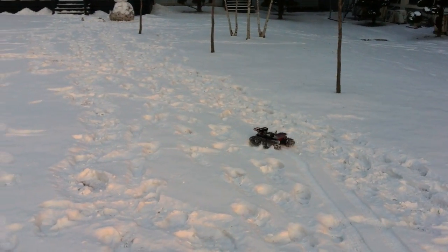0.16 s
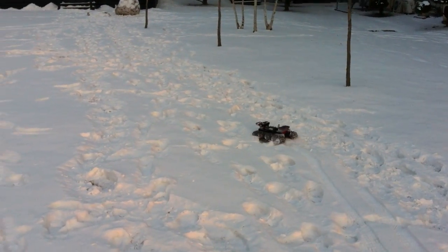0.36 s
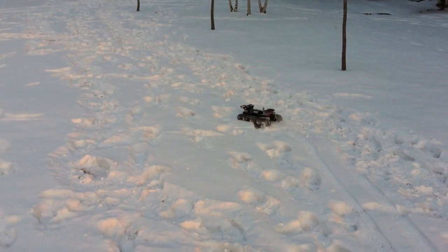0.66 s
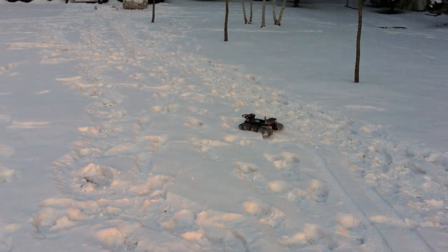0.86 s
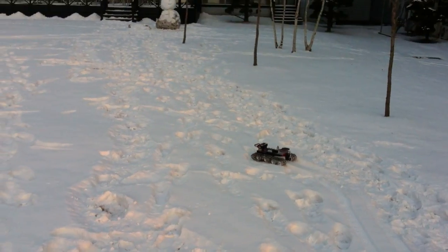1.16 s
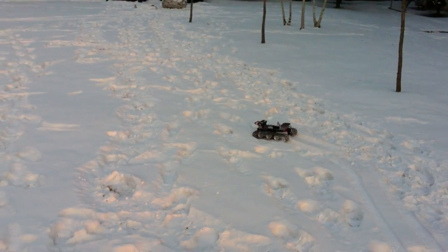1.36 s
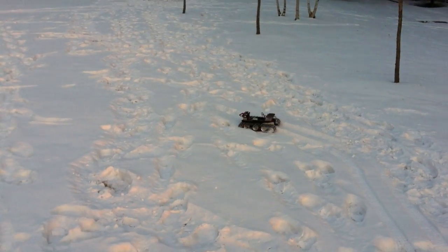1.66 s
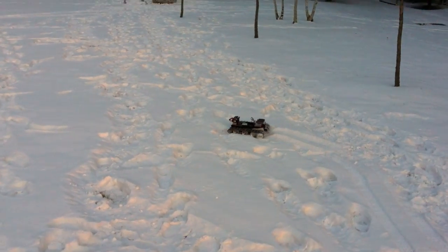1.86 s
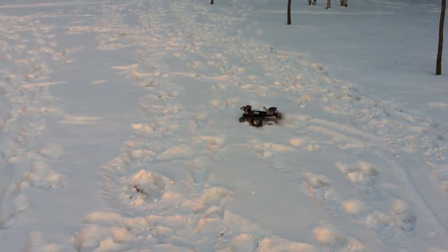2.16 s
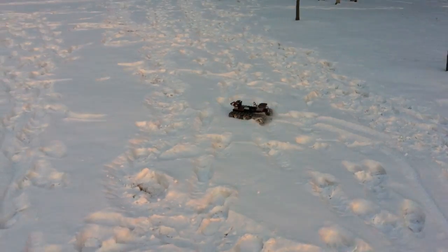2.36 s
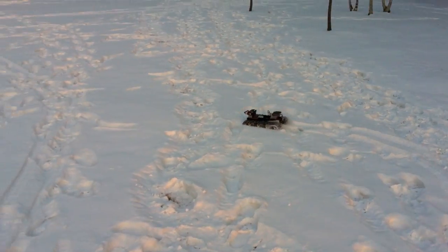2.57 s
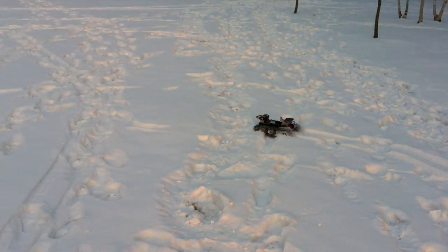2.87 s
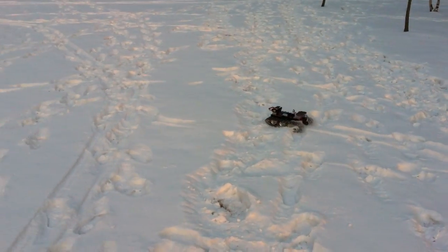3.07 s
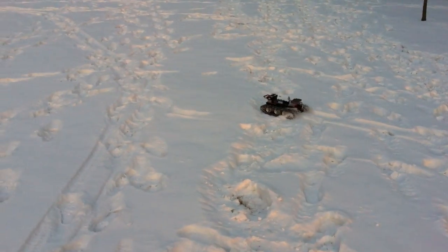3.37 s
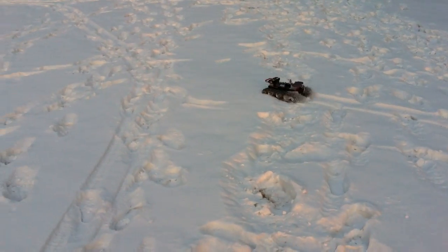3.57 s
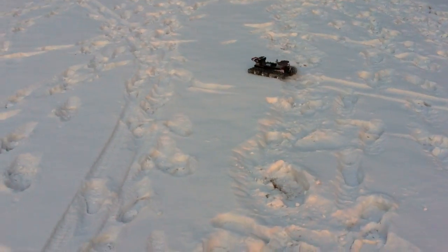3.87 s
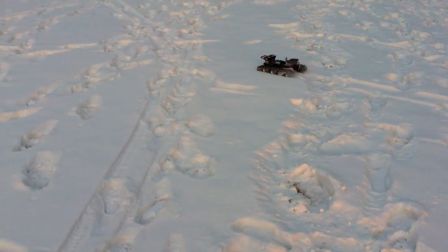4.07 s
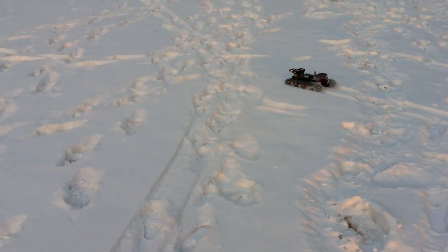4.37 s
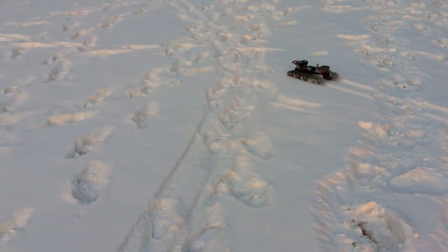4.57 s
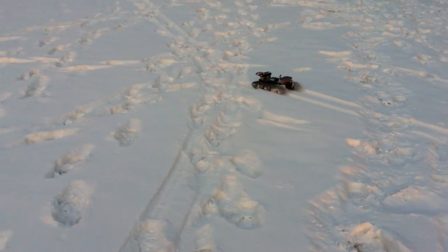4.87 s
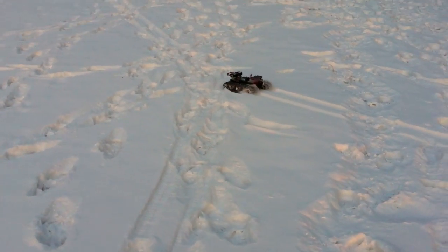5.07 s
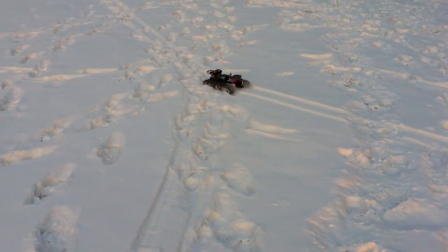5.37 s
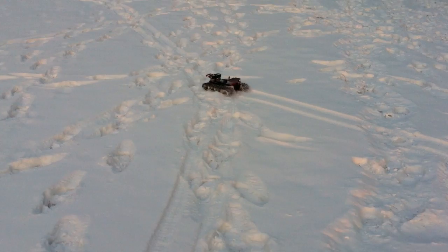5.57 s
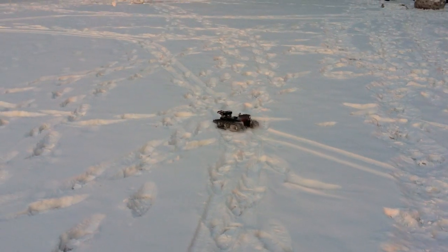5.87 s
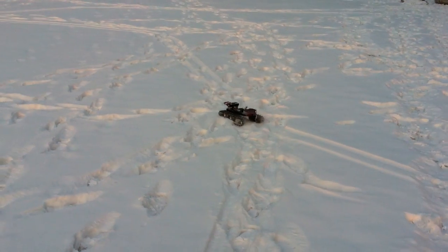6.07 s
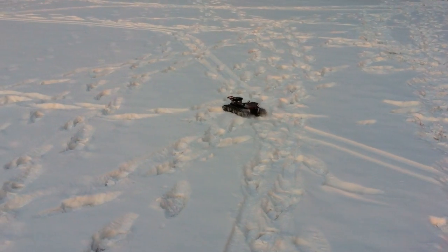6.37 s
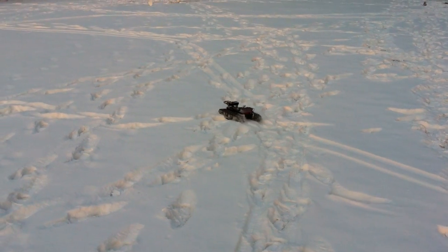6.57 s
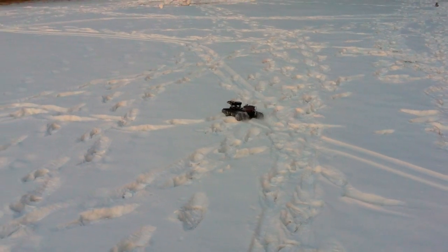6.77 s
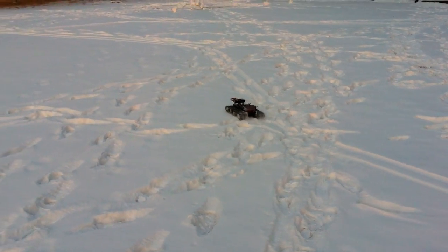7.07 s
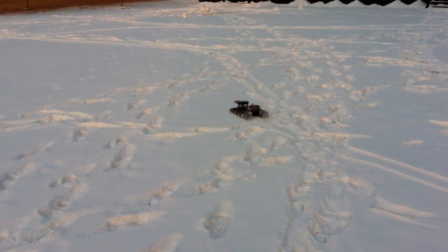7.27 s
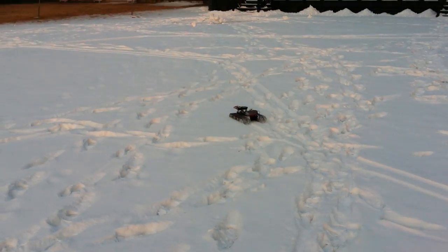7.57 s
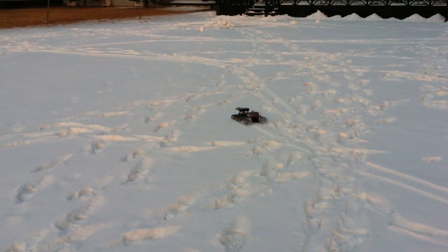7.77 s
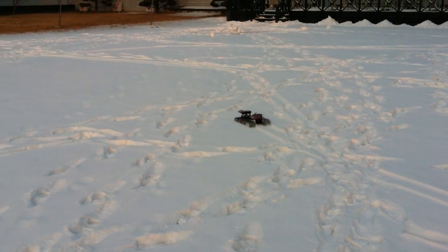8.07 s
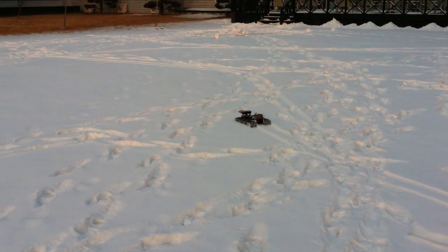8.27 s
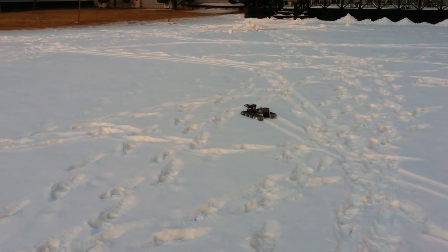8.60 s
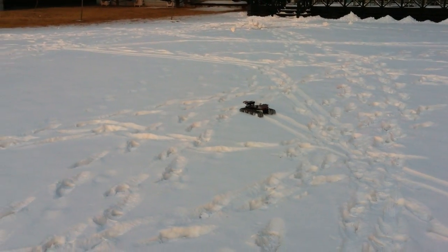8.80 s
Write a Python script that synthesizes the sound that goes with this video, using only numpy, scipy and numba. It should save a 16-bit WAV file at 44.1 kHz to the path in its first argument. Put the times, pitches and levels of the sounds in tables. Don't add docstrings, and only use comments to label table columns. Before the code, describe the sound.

Dry, close outdoor sound of a toy-sized tracked machine on trodden snow. First comes a halting, wavering motor whine with light gear rattle and a few crusty ticks, then a sudden speed-up into dense, bright buzzing clatter with rapid fluttering as the tracks bite. Muted snow crunches and low wind buffeting lie beneath. Just after eight seconds the motor slows to a weak creep, while wind bumps on the microphone grow much stronger.

```python
import sys
import numpy as np
from scipy import signal
from scipy.io import wavfile
from scipy.ndimage import uniform_filter1d
from numba import njit

SR = 44100
rng = np.random.default_rng(int(sys.argv[2]) if len(sys.argv) > 2 else 0)


def to_linear_factor(level_db):
    exponent = np.asarray(level_db, float) / 20
    return 10 ** exponent


def materialize(psi):
    bounded = np.clip(np.atleast_2d(psi).T, -1, 1)
    quanta = np.round(bounded * 32767).astype(np.int16)
    wavfile.write(sys.argv[1], SR, quanta)


N = 394254
T = np.arange(N) / SR


@njit
def svf(x, hz, width):
    y, b, l = np.empty(len(x)), 0., 0.
    for i in range(len(x)):
        g, k = np.tan(np.pi * hz[i] / SR), width / hz[i]
        v = (b + g * (x[i] - l)) / (1 + g * (g + k))
        b, l, y[i] = 2 * v - b, l + 2 * g * v, k * v
    return y


def band(x, hz, width):
    hz = hz + np.zeros(N)
    return svf(svf(x, hz, 1.62 * width), hz, 1.62 * width)


def unit(x):
    return x / np.sqrt(np.mean(x ** 2))


def noise_mode(hz, width, force=1):
    return unit(band(force * rng.standard_normal(N), hz, width))


def columns(table):
    s, *cols = np.transpose(table)
    return [np.interp(T, s, c) for c in cols]


def walk(rate):
    k = int(SR / rate)
    steps = np.repeat(rng.standard_normal(N // k + 1), k)
    return unit(uniform_filter1d(uniform_filter1d(steps, k), k)[:N])


def bursts(events):
    out = np.zeros(N + 4096)
    t = np.arange(-2048, 2048) / SR
    for s, db, hz, ms in events:
        i = int(s * SR)
        out[i:i + 4096] -= to_linear_factor(db) * np.exp(-(t / (0.00056 * ms)) ** 2) * np.cos(2 * np.pi * hz * t)
    return out[2048:N + 2048]


# t/s, peak level/dB, rise/s, fall/s
STEPS = [(.01, -69, 0.027, 0.045), (.32, -51, 0.33, 0.082), (1.03, -51.5, 0.025, 0.12),
         (1.939, -55, 0.17, 0.21), (2.31, -52, 0.017, 0.017), (2.71, -47, 0.028, 0.051),
         (3.19, -54.5, 0.39, 0.098), (3.56, -51, 0.25, 0.15), (3.74, -53, 0.05, 0.11),
         (8.17, -64, 0.06, 0.049), (4.31, -49.5, 0.15, 0.18), (5.03, -51.5, 0.13, 0.15),
         (5.98, -50, 0.15, 0.047), (6.77, -55.5, 0.55, 0.19), (7.12, -57, 0.028, 0.14),
         (8.79, -63, .02, .02)]


def boots_db():
    hum_db = -57 - 0.2053 * T + walk(9)
    power = to_linear_factor(2 * hum_db)
    for s, db, rise, fall in STEPS:
        power = power + to_linear_factor(2 * db) * np.exp(-((T - s) / np.where(T < s, rise, fall)) ** 2)
    return 10 * np.log10(power)


# t/s, peak level/dB, f/Hz
TICKS = [
    (0.295, -42, 902),
    (0.442, -39, 1980),
    (0.536, -36.5, 1338),
    (0.701, -38.5, 952),
    (1.229, -37, 570),
    (2.698, -46, 444),
    (7.746, -36.5, 1266),
]


def snow(crunch_db):
    grains = rng.standard_normal(N) * to_linear_factor(2.1 * walk(150))
    crunch = 0
    for hz, width, db in [(438, 337, 4.8), (806, 560, 4.5), (1314, 640, 4.1)]:
        crunch = crunch + to_linear_factor(db + 1.6 * walk(12)) * unit(band(grains, hz, width))
    ticks = bursts([(s + 0.0021, db - 0.5, 0.6 * hz, 1.6) for s, db, hz in TICKS])
    return to_linear_factor(crunch_db - 1.9) * unit(crunch) + ticks


# t/s, level/dB
GUSTS = [(0, -62), (.35, -62), (.95, -63), (1.05, -59), (1.45, -63.5), (2, -59), (3.2, -60), (3.7, -59),
         (4.3, -58), (4.83, -64), (5.15, -57.5), (5.65, -60.5), (5.97, -55.5), (6.1, -63), (7.6, -63.5),
         (8.25, -61), (8.45, -57), (8.94, -60.5)]
# t/s, peak level/dB, f/Hz, length/ms
THUMPS = [(1.981, -44.5, 148.5, 8.4), (2.06, -46, 232, 15), (3.695, -46, 150, 6.3),
          (3.724, -41, 191.6, 3.46), (3.812, -43, 163.4, 7.3), (3.877, -47.5, 233, 30),
          (4.073, -44, 182, 12), (4.197, -43, 205.8, 20), (4.319, -48, 229.8, 4.73), (5.165, -42, 137, 9.5),
          (5.325, -41, 171.2, 18), (5.372, -42, 152.7, 6.7), (5.515, -49, 131, 14), (5.591, -42, 182, 7.2),
          (5.783, -40, 155, 5.4), (5.902, -44, 168.6, 6.6), (5.929, -37.5, 163, 7.4),
          (5.978, -46, 136.8, 8.8), (7.783, -40, 164.3, 11), (7.814, -36.5, 170.2, 5.4),
          (8.335, -42, 169, 9.5), (8.366, -34, 168, 7.8), (8.4, -36, 182, 6.2), (8.458, -36.5, 132.6, 13),
          (8.475, -32, 172.7, 6.1), (8.543, -40, 156.8, 11), (8.589, -36.5, 206, 5.6),
          (8.715, -36, 171, 6.7), (8.739, -38.5, 162.5, 8.7), (8.8, -19.5, 229, 5.3),
          (8.809, -36, 222.7, 7.2), (8.845, -44, 187, 10)]


def wind():
    gust_db = columns(GUSTS)[0]
    deep_db = -7.5 + 2.0 * (gust_db + 61.0)
    eddies = noise_mode(184.0, 123) + to_linear_factor(deep_db) * noise_mode(116, 56)
    shed = [(s + 0.0216, db - 10, 0.79 * hz, 14) for s, db, hz, ms in THUMPS]
    thumps = bursts(THUMPS + shed)
    return to_linear_factor(gust_db - 1.0 + 1.8 * walk(28)) * eddies + thumps - 2.7 * thumps ** 2


# t/s, level/dB, lower, middle, upper f/Hz
PANELS = [(0, -21, 2300, 3700, 4050), (2.05, -8, 2280, 3770, 4120), (2.15, -7, 2274, 3600, 4010),
          (2.8, -5.5, 2296, 3550, 4030), (3.6, -8, 2212, 3491, 3980), (4.5, -12, 2250, 3850, 4094),
          (5.5, -6, 2430, 4050, 4250), (6.3, -11.5, 2449, 3950, 4200), (7.2, -12.5, 2430, 4090, 4367),
          (8.04, -10, 2420, 4036, 4300), (8.12, -12, 2428, 4050, 4270), (8.94, -22, 2440, 4050, 4300)]
PANEL_TILT_DB = (0, -1, -3)


def panels(beat):
    db, *centres = columns(PANELS)
    out = 0
    for hz, tilt_db in zip(centres, PANEL_TILT_DB):
        centre_hz = hz * (1 + 0.016 * walk(14))
        out = out + to_linear_factor(tilt_db + 2.35 * walk(35)) * noise_mode(centre_hz, 136, beat)
    return to_linear_factor(db) * out


# t/s, level/dB
SNAPS = [(.585, 7), (.745, 4), (1.04, 5), (1.29, 6), (1.54, 5), (1.87, 4), (2.11, 4), (5.64, 4), (6.23, 4),
         (8.04, 4), (8.29, 4), (8.39, 5)]


def snap_db():
    return sum(db * np.exp(-((T - s) / .009) ** 2) for s, db in SNAPS)


def ring(beat, modes, flicker_db, shift):
    out = 0
    for hz, width, db in modes:
        centre_hz = hz * shift * (1 + 0.02 * walk(3.93))
        out = out + to_linear_factor(db + flicker_db * walk(22)) * noise_mode(centre_hz, width, beat)
    return unit(out)


# t/s, depth 0-1, lower, middle, upper f/Hz
VALLEYS = [(0, 0, 3000, 4350, 4880), (2, 0.4, 3020, 4400, 4700), (2.15, 0.9, 2930, 3280, 4740),
           (2.8, 0.7, 2810, 3170, 4746), (3.7, 1, 2989, 3719, 4736), (4.6, .85, 2950, 3640, 4660),
           (5.3, 0.76, 3003, 3660, 4770), (6.2, 0.79, 3040, 3669, 4842), (6.9, 0.5, 2900, 3400, 4800),
           (8, 0.69, 2920, 3385, 4913), (8.3, 0.48, 3022, 3472, 4880), (8.94, 0.69, 3034, 3490, 4805)]


def carve_valleys(hull):
    depth, *valleys = columns(VALLEYS)
    for valley_hz, share in zip(valleys, (1, 1, .55)):
        cut = np.clip(share * depth + 0.2 * walk(4.04), 0, 1)
        hull = hull - cut * svf(hull, valley_hz * (1 + 0.014 * walk(5.1)), 220.0)
    return hull


TEETH_PER_TURN = 42
# t/s, mean mesh f/Hz, clatter level/dB, mesh tone level/dB,
# partner tone level/dB (the octave when creeping, the half-mesh tone at speed)
DRIVE = [(0, 1794, -50.5, -57, -50), (.9, 1752, -49.5, -52, -53.5), (1.4, 1768, -51.5, -51.5, -50),
         (1.6, 1774, -52, -51, -43.5), (1.92, 1796, -50.5, -39, -36.5), (1.985, 2580, -49, -38, -47),
         (2.087, 2676, -51, -41, -62), (2.111, 3026, -48, -62, -57.5), (3.05, 3272, -44.5, -53, -54),
         (3.68, 3194, -46, -60.5, -55.5), (4.4, 3275, -45.5, -63, -58), (5.15, 3400, -46, -61, -57),
         (6.4, 3178, -47.5, -57, -59.5), (7.3, 3160, -48, -57, -62), (7.99, 3170, -48.5, -59.5, -65),
         (8.025, 3223, -48.5, -53, -68), (8.06, 2930, -48, -56, -72), (8.085, 2760, -52.5, -56, -72),
         (8.11, 2610, -52, -53, -75), (8.135, 2450, -52.5, -66, -73), (8.21, 1994, -55.5, -70, -67),
         (8.26, 1894, -52.5, -60, -46), (8.94, 1855, -55.5, -55.5, -52)]
# t/s, f/Hz, level/dB above the other low modes
MAIN_MODE = [(0, 1730, -6), (2.05, 1645, -1.5), (2.15, 1577, -3), (4, 1617, -4.5), (5.2, 1696, -1),
             (5.6, 1627, -3.5), (6.5, 1706, 0.5), (8, 1720, -4), (8.2, 1783, -9), (8.94, 1780, -3)]
# f/Hz, width/Hz, level/dB
HULL_LOW = [(890, 174, -9.5), (1296, 200, -9), (1870, 340, -2.5), (2340, 255, -4.5), (2783, 340, -1),
            (3400, 420, -7.5), (4124, 1120, -3)]
HULL_MID = [(4580, 2200, -1), (5200, 1580, -2), (5500, 970, -9.5), (6445, 320, -1), (7620, 2070, -4)]
HULL_TOP = [(8870, 640, 5), (9634, 460, 6.5), (11300, 11000, 9.5), (13160, 1300, -0.5), (15200, 640, -6)]


def clatter(phase, slack, bite_db, echo_shift):
    turn = phase / TEETH_PER_TURN
    shaft_db = 1.08 * np.sin(turn) + 0.87 * np.sin(2 * turn)
    beat = to_linear_factor(shaft_db + 0.13 * walk(17) + 0.11 * bite_db - 2.3 * slack)
    beat = beat * to_linear_factor(1.9 * np.minimum(rng.exponential(size=N), 8))
    snaps_db = snap_db()
    whole_db = columns(DRIVE)[1] + 0.45 * walk(17)
    swell_2s_db = 5 * np.exp(-((T - 2) / 0.83) ** 2)
    low_db = -4.5 + swell_2s_db + 0.71 * walk(6.4)
    rattle_db = .15 * bite_db + .8 * walk(30) + snaps_db
    top_db = -3.5 + 0.65 * walk(24) + 0.7 * snaps_db
    main_hz, main_db = columns(MAIN_MODE)
    main_db = main_db + .7 * bite_db - 2.0 - 1.1 * slack + 1.1 * walk(50)
    low = ring(beat, HULL_LOW, flicker_db=0.5, shift=0.94)
    low = low + to_linear_factor(main_db) * noise_mode(main_hz, 121, beat)
    low = low + panels(beat)
    hull = to_linear_factor(low_db + 1.5) * low
    hull = hull + to_linear_factor(rattle_db - 4.0) * ring(beat, HULL_MID, flicker_db=1.0, shift=0.96)
    top_db = top_db + 0.41 * rattle_db + 1.0
    hull = hull + to_linear_factor(top_db) * ring(beat, HULL_TOP, flicker_db=1.5, shift=echo_shift)
    return to_linear_factor(whole_db) * carve_valleys(hull)


def whine(phase, slack, tone_db, octave_db, half_db):
    turn = phase / TEETH_PER_TURN
    wobble = .45 * np.sin(turn) + .38 * walk(180)
    rasp = .42 * walk(350)
    flutter_db = 3.0 * walk(80)
    tone = to_linear_factor(tone_db - 1.6 - 8 * slack + flutter_db) * np.sin(phase + wobble)
    octave_gain = to_linear_factor(octave_db - 4.0 - 16 * slack - 0.84 * flutter_db + 1.5 * walk(40))
    octave = octave_gain * np.sin(2 * (phase + wobble) + rasp)
    twelfth = np.sin(3 * (phase + wobble) + 1.9 * walk(300))
    half_gain = to_linear_factor(half_db + 7 - 5 * slack + 2 * walk(60))
    half = half_gain * np.sin(phase / 2 + .5 * np.sin(turn) + .25 * walk(150))
    three_halves_gain = to_linear_factor(np.minimum(tone_db - 4, -56.5) - 6 * slack + 3.5 * walk(45))
    three_halves = three_halves_gain * np.sin(3 * phase / 2 + wobble + 1.1 * walk(200))
    octave = band(octave, 3820, 760)
    steady_twelfth = to_linear_factor(-52.5) * band(twelfth, 5095, 165)
    loaded_twelfth = to_linear_factor(-8.5) * band(to_linear_factor(np.minimum(octave_db, -49)) * twelfth, 5960, 570)
    three_halves = band(three_halves, 2510, 380)
    half = band(half, columns(MAIN_MODE)[0], 275.0)
    return np.sqrt(2) * (tone + octave + steady_twelfth + loaded_twelfth + three_halves + half)


# t/s, slowest/%, race/ms, fastest/%, bite level/dB
CREEP_OUT = [(0.017, -3, 53, 2, 4.5), (.108, -5.5, 52, 13, 3), (.208, -3, 34, 0.5, 4.5),
             (.296, -7, 30.6, 4.5, 2), (0.371, 2, 10, 10, 2), (0.463, 1, 1.7, 1.5, 5),
             (0.487, -6.5, 37, 3, 1), (0.573, 1, 18, 9, 1.5), (0.649, 4, 1.7, 3, 7),
             (0.671, -10, 40, 1, -0.5), (.752, 1.5, 2.34, 1.5, 5), (.78, -11, 35, 1.5, 1),
             (.822, -4, 8.8, 7.5, -1.5), (.894, .5, 1.7, 2, -4), (.948, -10, 30, -8, -9),
             (.986, -7, 12, 1, 1.5), (1.029, -5.5, 26, 8, -4), (1.094, 7.5, 1.85, 7, -3),
             (1.14, -7.5, 32, 5.5, 2.5), (1.222, -12, 42.5, -6.5, 2.5), (1.275, -6.5, 21.7, 6.5, 3),
             (1.377, -3, 2.1, -3, 3.5), (1.411, -12, 21, -14, 2.5), (1.442, -15, 18, -1, 7),
             (1.529, -7.5, 34, 10, 2.5), (1.62, -5.5, 84, 1.5, 4.5), (1.739, 2, 22, 15, -1.5),
             (1.821, -6.5, 29, 1.5, -1), (1.896, -2, 6.1, 0, -7)]
CREEP_AWAY = [(8.245, 5.5, 9.9, 10.5, -0.5), (8.357, -2.5, 9.7, 9.5, 2.5), (8.445, -3.5, 22, 0, 0.5),
              (8.5, -1.5, 17.3, 11.5, 2.5), (8.58, -8.5, 16.5, -4.5, -2), (8.626, -5.5, 7.7, 9, -1),
              (8.679, -1.5, 25, -1, 2), (8.766, -9, 15, -1, 0), (8.815, -1, 8.4, 8.5, 0),
              (8.859, 1, 10.6, -0.5, 2.5), (8.94, -7, 10, -1.5, -3)]


def lug_slip():
    s, slow, ms, fast, bite = np.transpose(CREEP_OUT + CREEP_AWAY)
    free = s + ms / 1000
    hold = np.minimum(free + .018, (free + np.append(s[1:], 10)) / 2)
    times = np.ravel([s, free, hold], order="F")
    creep = np.interp(T, times, np.ravel([slow, fast, fast], order="F"))
    last = np.clip(np.searchsorted(s, T) - 1, 0, None)
    return creep, uniform_filter1d(bite[last], size=600)


# t/s, length/s, bite level/dB, stroke f/Hz
BITES = [(2.094, 0.041, -37.5, 1570), (2.152, 0.036, -43, 1591), (2.199, 0.055, -40.5, 1552),
         (2.272, 0.063, -39.5, 1592), (2.341, 0.043, -52, 1663), (2.387, 0.092, -42, 1579),
         (2.47, 0.12, -42.5, 1611), (2.581, 0.034, -45, 1634), (2.618, 0.095, -42, 1592),
         (2.729, 0.085, -46, 1589), (2.886, 0.074, -45, 1580), (2.975, 0.07, -45.5, 1660),
         (3.094, 0.029, -46, 1563), (3.146, 0.04, -46, 1600), (3.193, 0.047, -42.5, 1617),
         (3.259, 0.066, -43, 1568), (3.367, 0.035, -43, 1550), (3.397, 0.076, -46, 1540),
         (3.519, 0.029, -41.5, 1671), (3.554, 0.062, -41, 1584), (3.607, 0.067, -44.5, 1600),
         (3.698, 0.052, -45.5, 1550), (3.77, 0.069, -50.5, 1647), (3.846, 0.068, -47, 1572),
         (3.938, 0.0402, -49, 1680), (3.986, 0.045, -46.5, 1614), (4.07, 0.038, -53, 1630),
         (4.125, 0.07, -55, 1689), (4.203, 0.05, -56, 1680), (4.294, 0.064, -51, 1658),
         (4.385, 0.05, -49.5, 1636), (4.473, 0.037, -48, 1676), (4.545, 0.04, -51.5, 1643),
         (4.615, 0.05, -52, 1610), (4.791, 0.037, -52, 1656), (4.829, 0.031, -49, 1620),
         (4.897, 0.067, -50, 1674),
         (5.007, 0.086, -52, 1711), (5.134, 0.04, -59, 1714), (5.178, 0.053, -49.5, 1726),
                 (5.234, 0.056, -51, 1703), (5.336, 0.033, -54, 1697), (5.454, 0.059, -56, 1652),
                 (5.515, 0.028, -50, 1570), (5.585, 0.095, -50, 1584), (5.725, 0.036, -50, 1635),
                 (5.797, 0.042, -57, 1612), (5.88, 0.12, -53.5, 1688), (6.052, 0.078, -55, 1715),
                 (6.16, 0.088, -50, 1654), (6.258, 0.059, -47, 1641), (6.328, 0.03, -51, 1638),
                 (6.362, 0.05, -48, 1683), (6.413, 0.066, -49, 1634),
         (6.499, 0.064, -46, 1654), (6.568, 0.069, -50, 1673), (6.645, 0.065, -46.5, 1624),
             (6.72, 0.092, -49.5, 1615), (6.81, .06, -48, 1619), (6.874, 0.058, -51, 1637),
             (6.98, 0.029, -51, 1624), (7.015, 0.1, -47, 1675), (7.146, 0.084, -45.5, 1632),
             (7.225, 0.04, -45, 1632), (7.301, 0.065, -45.5, 1635), (7.41, 0.044, -47, 1647),
             (7.475, 0.066, -46, 1638), (7.58, 0.044, -42, 1635), (7.655, 0.036, -44, 1664),
             (7.739, 0.073, -46, 1623), (7.812, 0.048, -47, 1669), (7.88, 0.072, -44, 1655),
             (7.96, 0.054, -49, 1629), (8.02, 0.067, -42, 1660)]


def bites():
    s, length, db, hz = np.transpose(BITES)
    off_pct = 100 * (hz / uniform_filter1d(hz, size=9) - 1)
    sag = np.minimum(95 * length / 2, 3.23)
    start, end = s + .006, s + length - .006
    times = np.ravel([start, end], order="F")
    saw = np.interp(T, times, np.ravel([off_pct + sag, off_pct - sag], order="F"))
    last = np.clip(np.searchsorted(start, T) - 1, 0, None)
    relative_db = db - uniform_filter1d(db, size=15)
    bite_db = np.where(T < end[last], relative_db[last], -7)
    return saw, uniform_filter1d(bite_db, size=300)


def swell_db(hz, mode):
    return mode[2] / (1 + ((hz - mode[0]) / mode[1]) ** 2)


# mesh f/Hz, width/Hz, level/dB
SAG_MODE, CLIMB_MODE = (1613, 125, 8.4), (2016, 81, 6.8)
# mesh f/Hz, width/Hz, level/dB
OCTAVE_VALLEY = (1610, 70, -14)


def drive():
    mean_hz, _, tone_db, partner_db = columns(DRIVE)
    (creep, creep_db), (saw, lug_db) = lug_slip(), bites()
    creeping = (T < CREEP_OUT[-1][0]) | (T > CREEP_AWAY[0][0])
    fast = np.clip((mean_hz - 2850) / 150, 0, 1)
    creep_pct = uniform_filter1d(creep * creeping, size=300)
    mesh_hz = mean_hz * (1 + (creep_pct + saw * fast) / 100)
    creep_db, lug_db = creep_db * creeping, lug_db * fast
    octave_db = partner_db + creep_db - 4 * fast
    octave_db = octave_db + swell_db(mesh_hz, CLIMB_MODE) + swell_db(mesh_hz, OCTAVE_VALLEY)
    tone_db = tone_db + creep_db + .5 * lug_db + 1.5 * fast + swell_db(mesh_hz, SAG_MODE)
    half_db = partner_db + creep_db + lug_db - 12 * (1 - fast)
    return mesh_hz, lug_db, tone_db, octave_db, half_db


# t/s, notch f/Hz
SNOW_NOTCH = [(0, 12000), (.9, 11300), (1.3, 11700), (2.5, 11060), (3.3, 11100), (4.1, 10840), (4.6, 11500),
              (5.7, 10880), (6.3, 11130), (7.5, 10830), (8.94, 11300)]


def vehicle():
    mesh_hz, bite_db, *tones_db = drive()
    climb = uniform_filter1d(np.gradient(np.log(mesh_hz)) * SR, size=500)
    slack = np.clip(climb / 6.6, 0, 1)
    phase = 2 * np.pi * np.cumsum(mesh_hz * (1 + .0035 * walk(40))) / SR
    notch_hz = columns(SNOW_NOTCH)[0] * (1 + 0.006 * walk(7.1))
    echo_shift = np.sqrt(notch_hz / np.mean(notch_hz))
    direct = whine(phase, slack, *tones_db) + clatter(phase, slack, bite_db, echo_shift)
    trade = np.clip(.5 + .3 * walk(3), 0, 1)
    direct = direct - (.82 - .4 * trade) * svf(direct, 1.022 * notch_hz, 600.0)
    return direct - (.42 + .4 * trade) * svf(direct, .972 * notch_hz, 600.0)


def scene():
    return (vehicle() + wind() + snow(boots_db()))[None]


# f/Hz, level/dB
HUSH_UNDER = [(1200, -60), (2000, -20), (3000, -9.5), (5000, -6.5), (7000, -4.2), (9500, -4), (11000, -5.2),
              (12000, -3.6), (13000, -2.9), (14500, -2.5), (15300, -1), (15700, 0)]


def hush(x):
    linger = 9
    hz, _, z = signal.stft(x, fs=SR, nperseg=1024, noverlap=768)
    power = uniform_filter1d(np.abs(z) ** 2, size=linger, axis=1)
    power = power.reshape(171, 3, -1).mean(axis=1)
    power_db = 10 * np.log10(np.abs(power) + 1e-20)
    under_db = np.repeat(power_db - uniform_filter1d(power_db, size=23, axis=0), 3, axis=0)
    mood = uniform_filter1d(rng.standard_normal(power.shape), size=linger, axis=1) * np.sqrt(linger)
    mood_db = 1.15 * np.repeat(mood, 3, axis=0)
    shut = under_db + mood_db < np.interp(hz, *np.transpose(HUSH_UNDER))[:, None]
    return signal.istft(z * to_linear_factor(-50 * shut), nperseg=1024, noverlap=768)[1][:N]


def band_limit(x):
    return signal.sosfilt(signal.butter(12, 15810, fs=SR, output="sos"), x)


def record(dry):
    port = signal.sosfilt(signal.butter(2, 71, "high", fs=SR, output="sos"), dry)
    top_cut = signal.ellip(10, .2, 70, 15740, fs=SR, output="sos")
    mix = signal.sosfilt(top_cut, hush(port[0]))[None]
    return band_limit(mix)


dry = scene()
out = record(dry)
materialize(out)
```